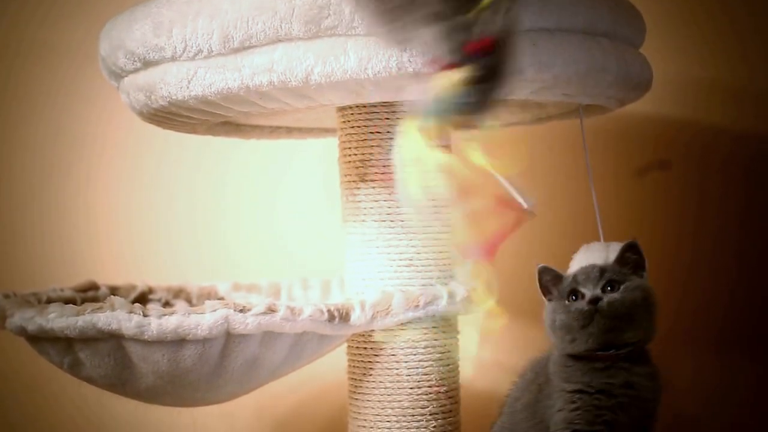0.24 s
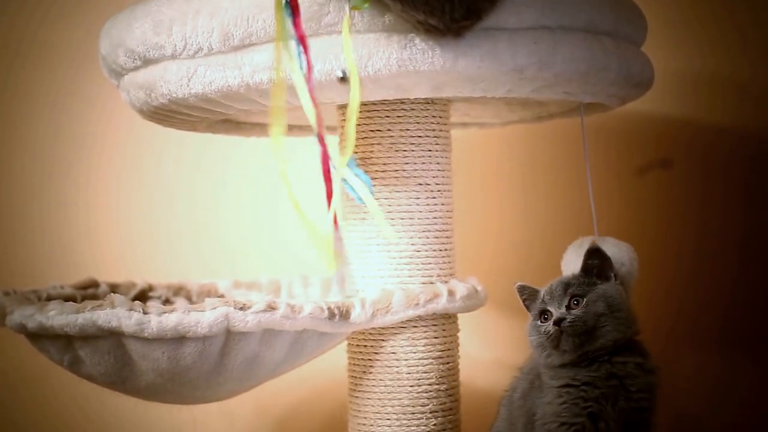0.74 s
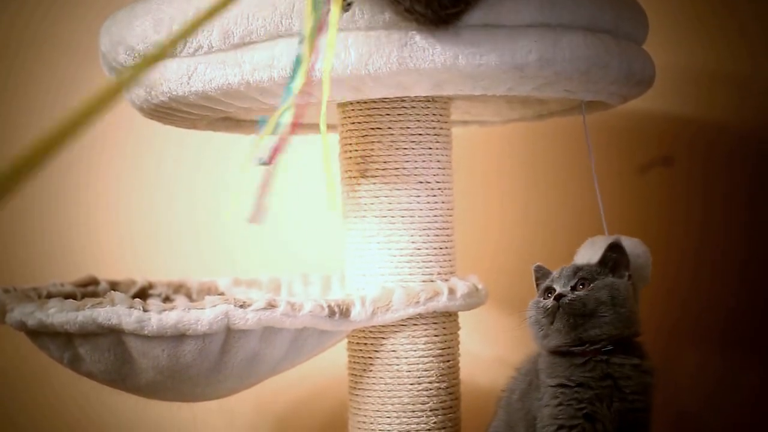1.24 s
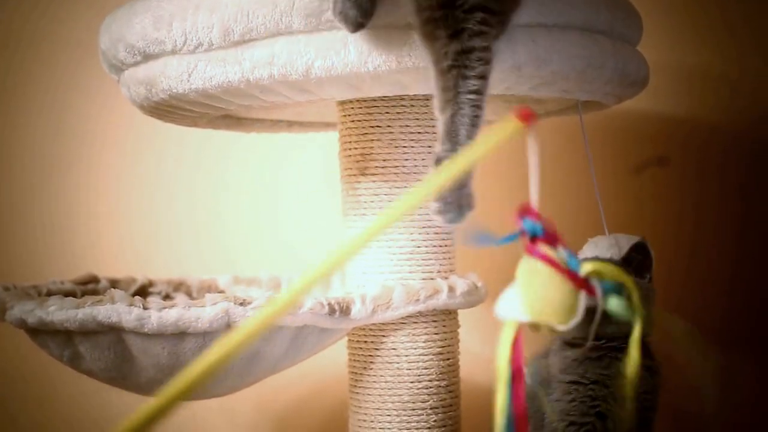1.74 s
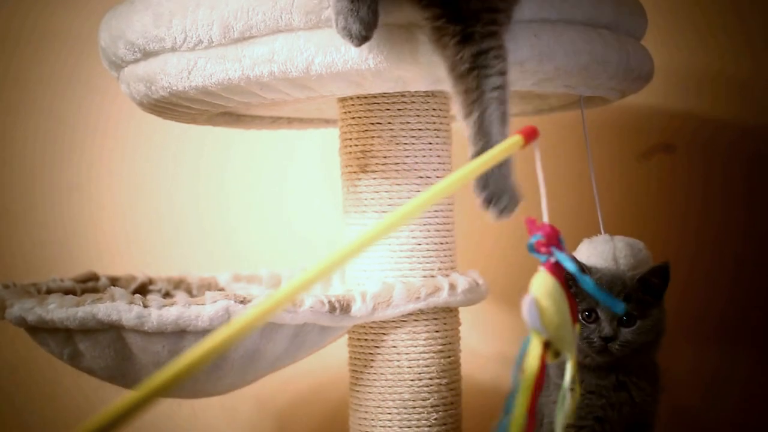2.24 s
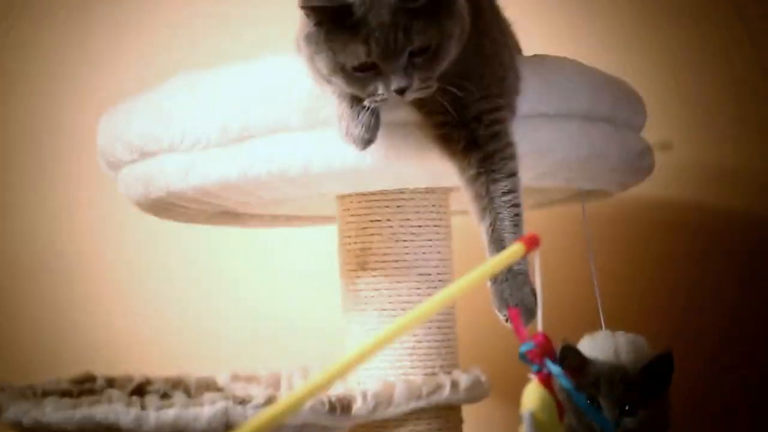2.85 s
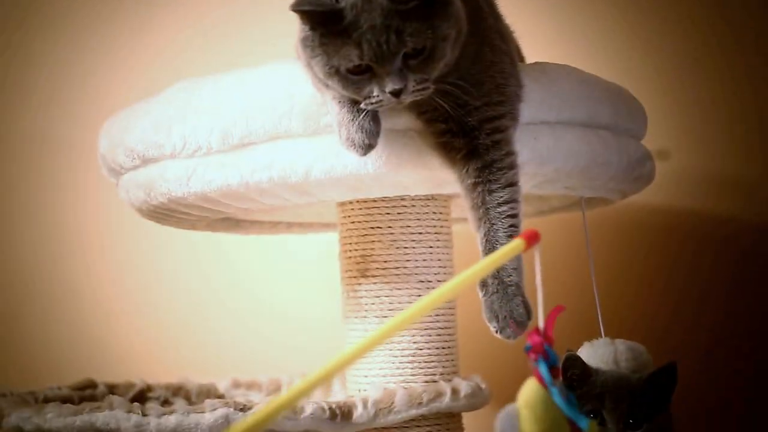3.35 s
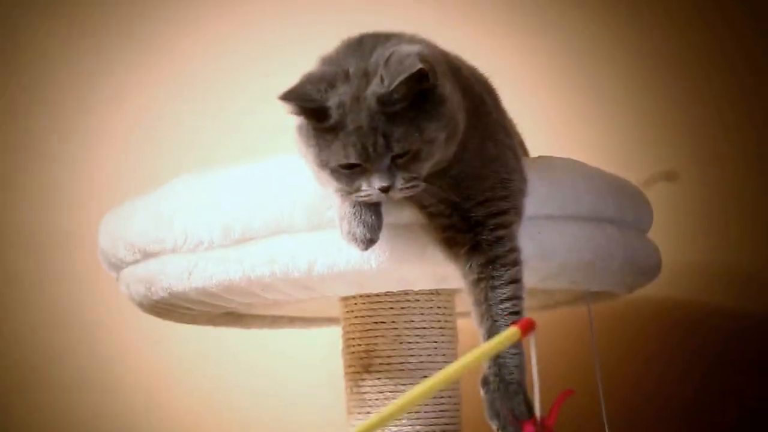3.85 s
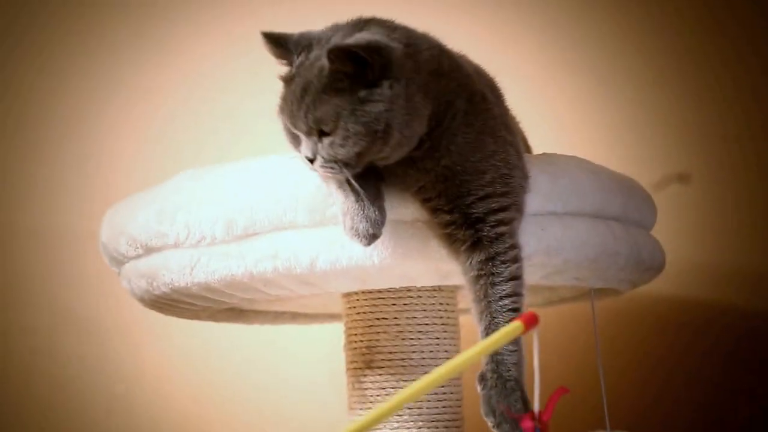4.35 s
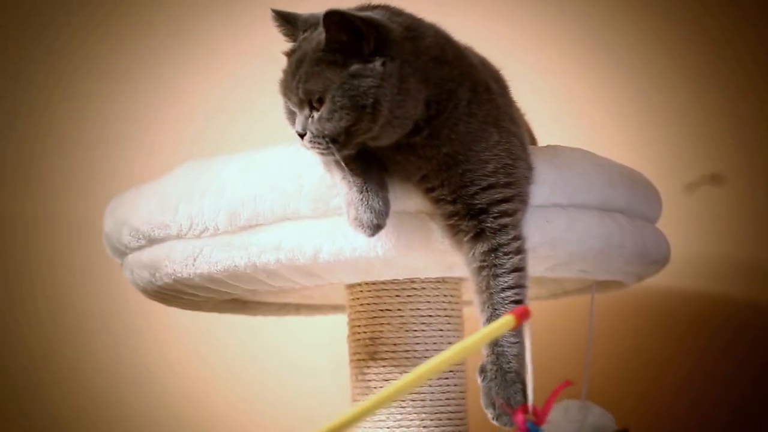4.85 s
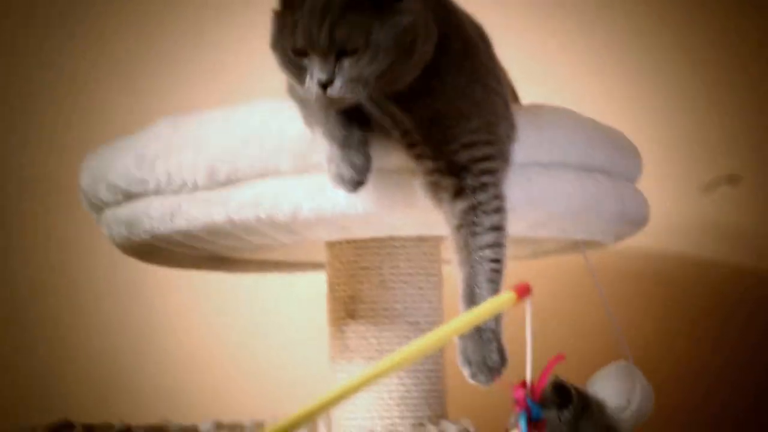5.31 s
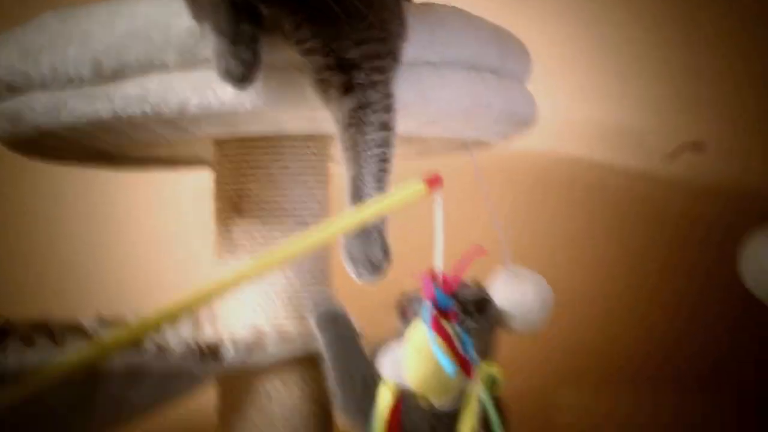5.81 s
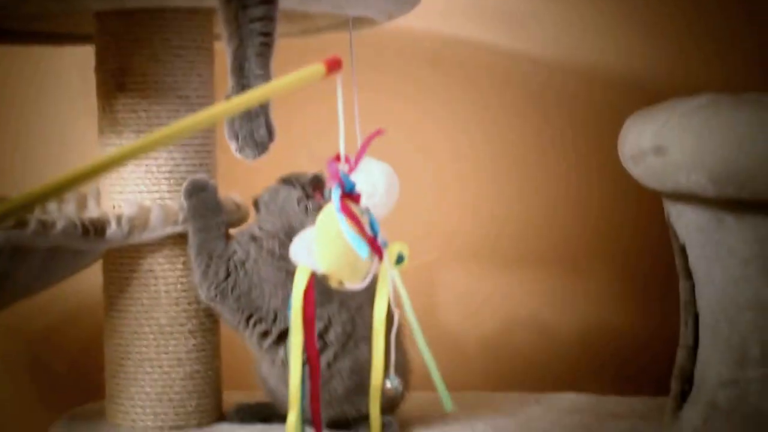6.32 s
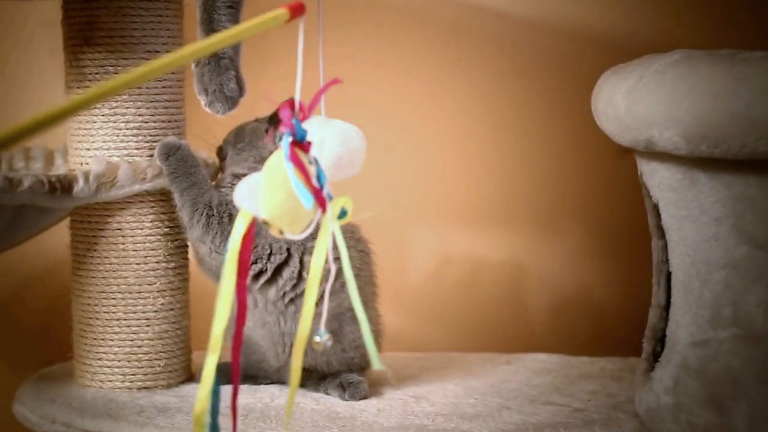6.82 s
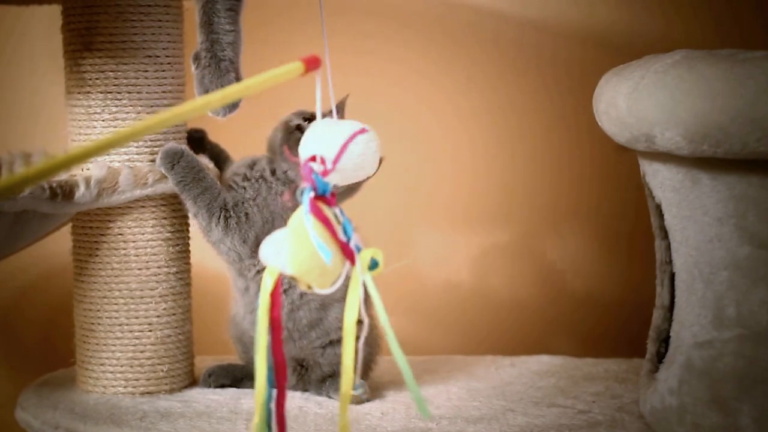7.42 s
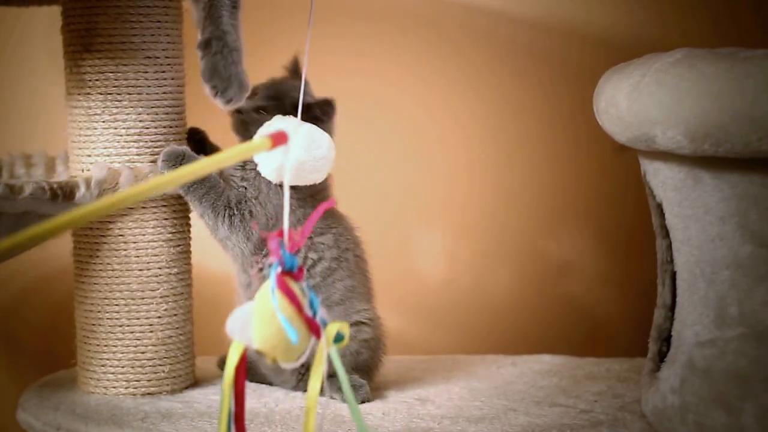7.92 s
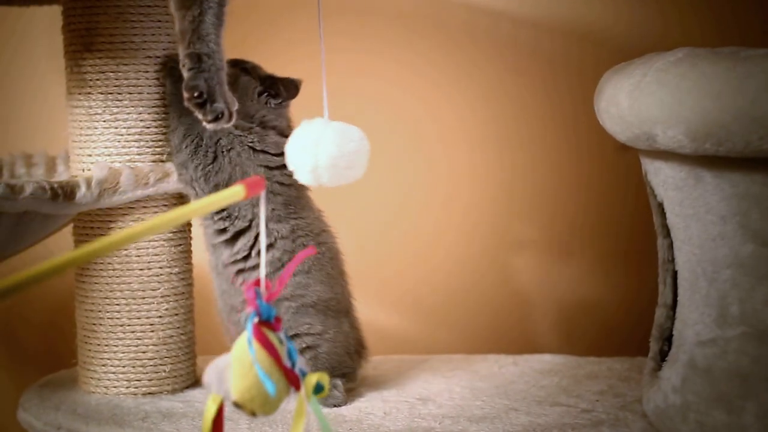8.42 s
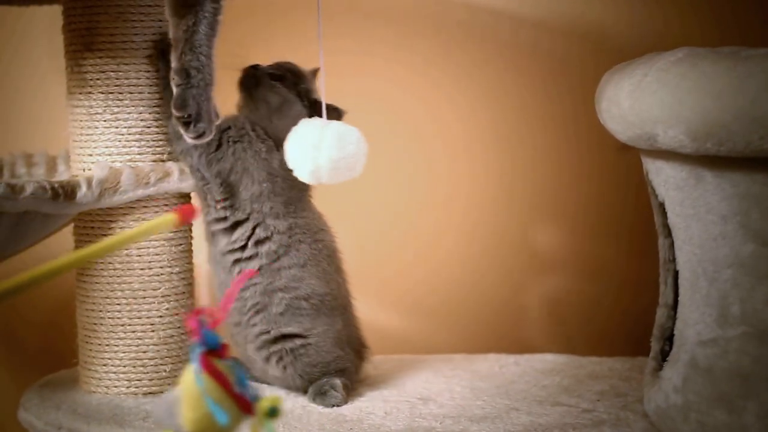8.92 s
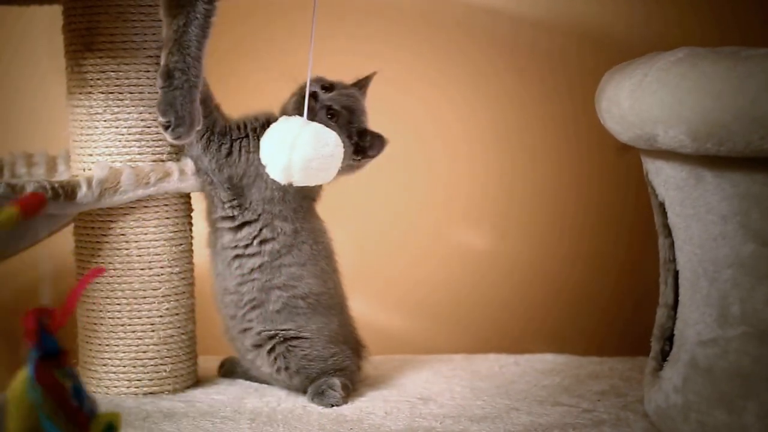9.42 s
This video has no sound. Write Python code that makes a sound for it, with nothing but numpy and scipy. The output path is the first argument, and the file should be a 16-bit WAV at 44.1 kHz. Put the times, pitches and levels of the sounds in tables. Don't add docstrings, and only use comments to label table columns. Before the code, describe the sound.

Small bell jingles, hushed hiss, sharp hollow plastic clacks, a rapid ratcheting creak around the middle, then soft brushes and light knocks indoors.

```python
import sys
import numpy as np
from scipy import signal
from scipy.fft import rfft, irfft, next_fast_len
from scipy.io import wavfile
from scipy.ndimage import uniform_filter1d, map_coordinates

SR = 44100
rng = np.random.default_rng(int(sys.argv[2]) if len(sys.argv) > 2 else 0)


def invert_db(level):
    return 10 ** (np.asarray(level, dtype=float) / 20)


def file_out(sig):
    cols = np.atleast_2d(sig).T
    lim = np.clip(cols, -1, 1)
    pcm = np.round(lim * 32767).astype(np.int16)
    wavfile.write(sys.argv[1], SR, pcm)


N = 426178

# centre [Hz], width [Hz], level [dB].
SHELL_MODES = [(918, 160, 4), (1262, 66, 9.5), (1400, 144, 1), (1813, 135, 9), (2155, 195, 10.5),
               (2560, 110, 6.5)]
LID_MODES = [(2930, 410, 6), (3950, 380, 5.5), (4340, 570, 4), (5100, 1070, -8.5)]
JOINT_MODES = [(364, 92, 0.5), (606, 150, 0.5), (798, 100, 0.5), (1200, 65, -0.5), (1442, 91, 0.5),
               (2450, 2900, -14.5), (3405, 960, -13)]
LEG_MODES = [(112.3, 8.4, 1), (145.7, 9.4, 0.5), (221, 71, 1)]


def unit(x):
    return x / np.sqrt(np.mean(x ** 2) + 1e-20)


def noise():
    return rng.standard_normal(N)


def along(points, hz):
    f, v = np.transpose(points)
    return np.interp(np.log(hz + 1), np.log(f + 1), v)


def filtered(x, response):
    m = next_fast_len(len(x) + min(len(x), SR // 2))
    return irfft(rfft(x, m) * response(np.fft.rfftfreq(m, 1 / SR)), m)[:len(x)]


def modes(table):
    def response(f):
        return sum((-1) ** k * invert_db(db) * 1j * f * width / (hz * hz - f * f + 1j * f * width)
                   for k, (hz, width, db) in enumerate(table))
    return response


def band(x, lo_hz, hi_hz):
    edges_hz = [lo_hz, min(hi_hz, SR / 2.1)]
    return signal.sosfilt(signal.butter(2, edges_hz, "bandpass", fs=SR, output="sos"), x)


def add(out, s, x):
    i = int(round(s * SR))
    out[i:i + len(x)] += x[:len(out) - i]


def crackle(t, tau_s):
    shape = (1 - np.exp(-t / tau_s * 5)) * np.exp(-t / tau_s)
    z = rfft(shape * rng.standard_normal(len(t)))
    return irfft(z / abs(z) ** .45, len(t)) * np.minimum(shape * 30, 1)


def series(start_s, length_s, db, gap_s, scatter, spread_db, larger):
    draw = rng.random((60, 2))
    gaps_s = gap_s * (1 + scatter * np.sqrt(12) * (draw[:, 0] - .5))
    s = start_s + np.cumsum(gaps_s)
    distance_s = abs(s[:, None] - np.transpose(larger)[0]).min(axis=1)
    free = (s < start_s + length_s) & (distance_s > gap_s / 2)
    levels_db = db + spread_db * (1 + np.log(draw[:, 1]))
    return list(zip(s[free], levels_db[free]))


def floor():
    # frequency [Hz], density [dB per Hz].
    air = [(15, -43.5), (25, -17), (172, -0.5), (483, -5), (584, -3.5), (746, -7.5), (1150, -7.5),
           (1320, -12), (3230, -12), (5720, -20.5), (6550, -21), (13300, -17), (15200, -18), (16500, -33.5)]
    # centre [Hz], width [Hz], level [dB].
    fan = [(596, 70, -77), (1195, 44, -85), ]
    # centre [Hz], width [Hz], level [dB].
    circuit = [(6725, 45, -88.5), (10040, 90, -84.5), (13420, 110, -89)]
    # time [s], level [dB].
    stir = [(0, -67), (.5, -69.5), (1.6, -68), (1.95, -59), (2.3, -65.5), (3.2, -73), (4.2, -63),
            (6.9, -62.5), (8, -66.5), (9.5, -66.5), (9.66, -59.5)]
    out = invert_db(-67) * unit(filtered(noise(), lambda f: invert_db(along(air, f))))
    for hz, width_hz, db in fan:
        out += invert_db(db) * unit(filtered(noise(), lambda f: 1 / (1 + ((f - hz) / width_hz * 2) ** 2)))
    for hz, width_hz, db in circuit:
        shake = np.sqrt(2 * np.pi * abs(width_hz) / SR) * noise()
        out += invert_db(db + 4) * np.sin(np.cumsum(2 * np.pi * hz / SR + shake))
    lumps = map_coordinates(rng.standard_normal(200), [np.arange(N) * 14 / SR])
    stir_db = np.interp(np.arange(N) / SR, *np.transpose(stir)) - 8.0 + 1.6 * lumps
    return out + invert_db(stir_db) * unit(band(noise(), 530, 2400))


def brush():
    # start [s], level [dB], t60 [s], low edge [Hz], top edge [Hz].
    brushes = [(1.618, -55, 0.52, 770, 5600), (9.105, -54.5, 0.6, 630, 1540), (9.12, -60, 0.44, 1900, 5500),
               (4.1, -70, 0.46, 550, 4300), (6.62, -65, 0.89, 620, 1600), (4.41, -68, .3, 7000, 9600),
               (4.52, -63, .3, 7600, 9600), (4.66, -68, .3, 7000, 9600), (4.797, -56, .4, 6500, 9700),
               (5.89, -62, .2, 4500, 9000), (8.49, -68, .9, 600, 1300), (9.52, -68, .7, 900, 1400),
               (8.71, -58, 0.61, 750, 1200), (6.245, -52, .5, 2500, 4100)]
    out, t = np.zeros(N), np.arange(SR // 2) / SR
    for s, db, t60, lo_hz, hi_hz in brushes:
        lumps = unit(uniform_filter1d(rng.standard_normal(len(t)), 300))
        level = invert_db(db + 2.5 * lumps - 60 * t / t60) * (1 - np.exp(-t / 0.0071))
        add(out, s, level * unit(band(rng.standard_normal(len(t)), lo_hz, hi_hz)))
    return out


def bell():
    # time [s], peak [dB], low modes [dB], side modes [dB], rattle [dB].
    strikes = [(0.1281, -39, -10, -14, -4), (0.1366, -34.5, -17, -3.5, -18), (0.1474, -43, -30, -26, -2.5),
               (0.298, -32, -26, -11.5, -5), (0.303, -38.5, -12, -10, -1.5), (0.3411, -36.5, -12, -12, -4),
               (.351, -42, -19, -20, -5.5), (1.492, -47.5, -16, -15, -2.5), (1.5219, -48, -19, -13, 0.5),
               (1.5592, -42, -11, -18.5, -3), (2.0148, -48.5, -12, -11, 0.5)]
    # frequency [Hz], level [dB], t60 [s].
    chime = [(2830, -10, .25), (4410, -6, .4), (4510, -6, .35), (4960, -6, .36), (5020, 0, .46),
             (5240, -8, .3), (9210, -11, .25), (9680, -3, .19), (10040, -6, .22), (11550, -3, .17),
             (11590, -6, .17), (11700, -9, .15)]
    # centre [Hz], width [Hz], level [dB].
    hollow = [(4860, 440, -6), (8000, 1600, -8.5), (10300, 3400, -13.5)]
    flutter_db, flutter_rad = 2.6, .45
    out, t = np.zeros(N), np.arange(SR // 2) / SR
    hz, mode_db, t60 = np.transpose(chime)[:, :, None]
    for s, db, low_db, side_db, rattle_db in strikes:
        flutter = uniform_filter1d(rng.standard_normal((2, len(hz), len(t))), 500) * 22
        group_db = np.where(hz < 6000, low_db + 4.0, np.where(hz < 9900, side_db + 5.5, -4))
        ring_db = mode_db + rng.normal(0, 1.9, hz.shape) + group_db + flutter_db * flutter[0]
        tones = np.sin(2 * np.pi * hz * t + flutter_rad * flutter[1])
        ring = (invert_db(ring_db - 60 * t / t60) * tones).sum(axis=0)
        fade = invert_db(-2.5 - 60 * t / 0.0082) + invert_db(-13.5 - 60 * t / 0.45)
        rattle = invert_db(rattle_db) * fade * 3 * filtered(rng.standard_normal(len(t)), modes(hollow))
        add(out, s, invert_db(db) * (invert_db(-16.5) * ring + rattle))
    return out


def chatter():
    # centre [Hz], width [Hz], level [dB].
    panel = [(3900, 470, 0.0), (3000, 500, -5.0)]
    start_s, gap_s, fade_db = 6.5795, 0.016, 4.5
    blows = np.zeros(N)
    k = np.arange(7)
    at = ((start_s + gap_s * k) * SR).astype(int)
    blows[at] = invert_db(-fade_db * k + rng.normal(0, 1, len(k)))
    ticks = filtered(filtered(blows, modes(panel)), modes(panel))
    return invert_db(-45) * ticks / abs(ticks).max()


def single_tones():
    # start [s], length [s], frequency [Hz], level [dB], fade t60 [s].
    moans = [(2.806, 0.17, 112, -42.5, 0.12), (2.99, 0.13, 210, -65.5, 0.49),
             (3.692, 0.048, 108.8, -43, 0.29), (4.86, 0.34, 146, -56.5, .2), (6.576, 0.19, 70, -59, .5),
             (8.315, 0.025, 62, -58, 0.31), (8.704, 0.023, 1900, -60.5, 0.22), (8.963, 0.025, 63, -59, 0.2),
             (9.102, 0.059, 692, -54, 0.15), (9.125, 0.023, 1100, -58, 0.22), (9.098, .008, 1040, -55, .06),
             (3.74, 0.058, 379, -45, 0.083), (7.56, .041, 100, -64, .21), (6.088, 0.04, 1510, -54, .08),
             (6.599, 0.059, 1100, -67, 0.96), (1.559, 0.0059, 367, -50.5, 0.06),
             (2.4505, 0.004, 323, -43.5, 0.052), (1.561, 0.025, 68, -57, 0.19),
             (7.016, 0.025, 52, -60, .21), (7.085, 0.025, 195, -55, .12), (7.245, .03, 200, -53, .12),
             (7.543, 0.005, 416, -49, 0.029), (8.705, 0.023, 207, -55.5, 0.11),
             (9.15, 0.021, 207, -55, 0.095), (2.787, 0.119, 388, -42.5, 0.059), (2.83, 0.083, 275, -47, .1),
             (4.105, .07, 3950, -72, .25), (3.69, .05, 2130, -47, .4), (3.69, .05, 3250, -52.5, .3),
             (2.79, .05, 2100, -51, .3), (1.557, .01, 5020, -59, .07), (2.942, .006, 400, -42, .05),
             (6.25, .06, 600, -44, .12), (8.71, .02, 1250, -64, .2), (6.7, .05, 1400, -70, .4),
             (8.975, .012, 650, -60, .06), (9.645, .015, 1150, -62, .1), (3.683, .02, 270, -40, .1),
             (5.36, .06, 205, -43, .15), (.532, .01, 1200, -66, .1), (6.985, .04, 1300, -64, .1)]
    out = np.zeros(N)
    t = np.arange(SR // 2) / SR
    for s, held_s, hz, db, t60 in moans:
        drift = uniform_filter1d(rng.standard_normal((2, len(t))), 700)
        fade_db = 60 * np.maximum(t - held_s, 0) / t60
        level = invert_db(db - 0.5 + 2.0 * np.sqrt(hz) * drift[0] - fade_db) * (1 - np.exp(-t * hz / 0.5))
        phase = 2 * np.pi * np.cumsum(hz + 16 * np.sqrt(hz) * drift[1]) / SR
        add(out, s, level * np.sin(phase))
    return out


def sway(jolts):
    rest_db, sway_db, t60_s = -82.5, -18.5, 0.7
    keep = invert_db(-60 / t60_s / SR)
    shake = signal.lfilter([1 - keep], [1, -keep], abs(jolts))
    return (invert_db(rest_db) + invert_db(sway_db) * shake) * unit(band(noise(), 55, 140))


def grit():
    # time [s], peak [dB].
    ticks = [(.537, -57), (.981, -44), (4.783, -44), (1.111, -43.5), (6.005, -37), (6.0169, -32),
             (6.032, -34), (6.2472, -30), (6.2763, -34), (6.2873, -33), (6.3109, -30.5), (6.3233, -37),
             (6.3432, -44), (6.3865, -44), (6.477, -38), (6.4837, -29), (6.4955, -46), (6.5146, -41),
             (6.5225, -34), (6.5687, -39), (8.72, -46), (6.2655, -39), (6.4305, -50), (6.45, -39),
             (6.4568, -42), (6.5285, -45), (6.537, -43), (6.556, -50), (6.5955, -52), (6.357, -46)]
    # start [s], length [s], level [dB].
    spells = [
        (5.95, .085, -49),
        (6.246, .11, -45),
        (6.43, .14, -60),
    ]
    grain_modes = [(3920, 600, 1.0), (8100, 560, 2.0), (11300, 2600, -12.0)]  # Hz, width Hz, dB
    out, t = np.zeros(N), np.arange(256) / SR
    grains = list(ticks)
    for start_s, length_s, db in spells:
        grains += series(start_s, length_s, db, gap_s=.006, scatter=.2, spread_db=7, larger=ticks)
    for s, db in grains:
        tick = filtered(crackle(t, 0.00019), modes(grain_modes))
        add(out, s, invert_db(db - 3.5) * tick / abs(tick).max())
    return out


def creak():
    # start [s], length [s], slips [dB], rubbing [dB], legs [dB].
    drags = [(2.438, 0.12, -72, -65, -52.5), (2.777, 0.2, -39.5, -49.5, -48),
             (3.691, 0.18, -57, -77, -45.5), (4.81, 0.092, -55, -68, -51), (5.034, 0.13, -50, -38.5, -42),
             (5.283, .28, -34, -41, -45.5), (5.61, 0.185, -40, -37.5, -39.5),
             (5.889, 0.23, -35, -37.5, -38), (6.19, 0.27, -36, -36.5, -37.5), (6.443, 0.17, -40, -37, -40),
             (7.282, 0.11, -56, -46.5, -58), (9.098, 0.17, -65, -55.5, -73)]
    # time [s], peak [dB].
    catches = [(2.833, -28), (2.9262, -23), (2.943, -25), (3.7922, -24), (3.8062, -21.5), (5.3308, -21),
               (5.3458, -28), (5.369, -24), (5.389, -22), (5.4235, -24), (5.4669, -22.5), (5.4946, -20.5),
               (5.622, -21), (5.6322, -22), (5.6448, -21), (5.6557, -24), (5.6733, -23), (5.6841, -24.5),
               (5.6946, -21.5), (5.706, -29), (5.7178, -23.5), (5.7395, -22.5), (5.7474, -33), (5.942, -24),
               (5.9502, -21.5), (5.9595, -21.5), (5.9683, -21), (5.9801, -22.5), (5.9903, -22),
               (5.9987, -26), (6.014, -21), (6.0283, -20.5), (6.048, -18.5), (6.0674, -20), (6.076, -28),
               (6.2532, -19), (6.2612, -25), (6.2725, -23.5), (6.2836, -21.5), (6.2977, -24), (6.3087, -20),
               (6.3213, -19), (6.3354, -18.5), (6.3499, -18), (6.363, -21.5), (6.3782, -22.5), (6.393, -19),
               (6.4016, -30), (6.4223, -19), (6.4473, -18), (6.4743, -21), (6.4937, -19), (6.5046, -23),
               (6.5203, -18.5), (6.5334, -18.5), (6.5424, -26), (6.5506, -25), (6.5603, -21.5),
               (6.5686, -25), (6.5766, -25),
               (5.376, -29), (5.432, -31), (5.445, -27), (5.476, -29), (5.505, -32), (5.521, -32.5),
              (5.937, -24), (6.4555, -25), (6.4655, -30), (6.483, -25), (6.514, -22), (6.527, -24),
              (6.5375, -26), (6.43, -29), (2.846, -28), (2.856, -31.5), (2.806, -28)]
    stick_s = 0.034
    larger = catches
    slips = list(larger)
    for s, length_s, slip_db, *_ in drags:
        slips += series(s + stick_s, length_s - 2 * stick_s, slip_db, gap_s=.0125, scatter=.13,
                        spread_db=4, larger=larger)

    push = np.zeros(N)
    for (s, db), z in zip(slips, rng.standard_normal((400, 81))):
        phase = np.linspace(0, 7.6 + .6 * z[0], 80) + .03 * np.cumsum(z[1:])
        add(push, s - .0019, invert_db(db + 3.0) * np.hanning(80) * np.sin(phase))
    body = modes(SHELL_MODES + LID_MODES)
    rasp = band(filtered(push * noise(), body), 1200, 4100)
    out = filtered(push, modes(JOINT_MODES)) + invert_db(-14) * rasp

    rubs = [unit(filtered(noise(), part)) for part in (modes(JOINT_MODES), modes(LEG_MODES), body)]
    joint_rub, leg_rub, body_rub = [unit(band(rub, 60, 3600)) for rub in rubs]
    shaken = np.sqrt(abs(uniform_filter1d(out ** 2, 250, origin=100)))
    shaken /= np.sqrt(abs(uniform_filter1d(out ** 2, 4000)) + 1e-6)
    joint_rub *= 0.44 + 0.73 * shaken
    body_rub *= .6 + 0.65 * shaken
    for s, length_s, _, rub_db, legs_db in drags:
        on = slice(int(s * SR), int((s + length_s) * SR))
        u = np.linspace(0, 1, on.stop - on.start)
        arch_db = rub_db - 6 * (2 * u - .9) ** 2
        rubbing = invert_db(arch_db - 3) * joint_rub[on]
        rubbing += invert_db(legs_db - 2.5 - 8 * u ** 2.54) * leg_rub[on]
        rubbing += invert_db(arch_db - 20) * body_rub[on]
        out[on] += rubbing * signal.windows.tukey(len(u), .12)
    return out


def releases():
    # time [s], peak [dB], dull, sharp and bright parts [dB].
    hard = [(1.6139, -36.5, -7, -0.5, -7.5), (2.7781, -12.5, -10, -9.5, -14.5),
            (3.68, -11.5, -13, -6.5, -15), (4.404, -33, -10.5, -12.5, -10.5),
            (4.5155, -27.5, -14, -7.5, -9), (4.6522, -24.5, -16.5, -9.5, -13.5),
            (4.791, -19.5, -17, -11, -12), (5.0443, -16, -12.5, -11.5, -15), (5.1009, -18, -18, -18, -22.5),
            (5.2717, -17.5, -18.5, -11, -16.5), (5.3599, -26, -4, -5.5, -9), (5.6138, -24.5, -5, -6.5, -10),
            (5.881, -20, -20, -11, -14.5), (5.9296, -19, -6.5, -9, -15.5), (6.1834, -22.5, -11, -8.5, -14),
            (6.2374, -17.5, -9.5, -11.5, -16), (7.0782, -37, -8.5, -8.5, -45), (7.236, -28.5, -13, -8, -28),
            (7.2906, -31.5, -22, -18, -21), (7.3189, -29.5, -21, -12.5, -18),
            (8.6972, -33.5, -12, -17.5, -38)]
    # time [s], peak [dB], dull part [dB], edge [dB].
    settles = [(2.2244, -44, -3.5, -31), (2.7646, -39, -4, -5.5), (2.838, -31, -7, -10.5),
               (2.9436, -43, 1, -22), (4.824, -38, -9, -18), (4.8386, -25, -14.5, -12),
               (4.8526, -36, 2, -24), (4.8647, -32.5, -4, -11), (4.9814, -40, -5, -24),
               (5.0178, -27, -17, -14), (5.2832, -36.5, -4, -7), (5.3211, -27.5, -14, -17),
               (5.4077, -23.5, -11, -13), (5.456, -30.5, -2.5, -22), (5.6088, -29, -0.5, -7.5),
               (5.663, -24, -12, -14), (5.8681, -32, -6.5, -26), (5.9075, -37.5, 0, -1),
               (5.923, -27, -7, -5), (6.0721, -33, -4.5, -22), (6.2246, -29, -4, -6),
               (6.2295, -25.5, -29, -11), (6.4479, -30.5, -2.5, -17), (6.4743, -36, 5, -21),
               (7.2483, -35, -12, -12.5)]
    # time [s], peak [dB], dull part [dB], edge [dB].
    taps = [(0.534, -61.5, 1.5, -11), (1.561, -62.5, 2.5, -9), (1.9415, -52, -8.5, -10),
            (2.27, -67, -36, -20), (2.6582, -69.5, 11, -11), (2.6878, -49.5, -7, -17),
            (4.0989, -53.5, 1, -9), (4.132, -56, -6, -25), (5.2352, -44, -0.5, -10),
            (7.017, -74.5, 16.5, -16), (7.1115, -53, -6.5, -27), (7.489, -51, 1, -18.5),
            (7.5451, -56, -29, -21.5), (7.552, -47, -9, -11.5), (8.981, -64, 12, -10),
            (9.1016, -53, -8, -5), (9.12, -50.5, -0.5, -1)]
    # time [s], peak [dB], dull, sharp and bright parts [dB].
    touches = [
        (1.577, -50.5, -8, -13, -8),
        (2.2297, -18, -24, -17.5, -29.5),
        (2.452, -54.5, 13, -25, -40),
        (2.5108, -52, -1, -16, -34),
    ]

    def edged(rows, slope, offset_db):
        return [(s, db, dull, edge, slope * edge + offset_db) for s, db, dull, edge in rows]

    kinds = [(hard, -9), (edged(settles, 1.06, -6.5), -6.5), (edged(taps, 1.3, -1.5), -3), (touches, -16)]
    out = []
    for rows, wet_db in kinds:
        mean_db = np.mean(rows, axis=0)[1]
        out += [(*row, wet_db - 0.2 * (row[1] - mean_db)) for row in rows]
    return out


def coloured(x, s):
    # time [s], centre [Hz], gain [dB].
    colours = [(1.6139, 450, -11), (1.6139, 1990, -12), (1.6139, 3100, -7), (1.6139, 8300, -6),
               (2.2295, 570, 5), (2.2295, 864, -8), (2.2295, 1160, 5.5), (2.7781, 1530, 0), (2.7781, 5100, 4),
               (2.7781, 3100, -1), (2.838, 1170, -11), (2.838, 3480, -8.5), (2.838, 570, 6.5),
               (3.68, 1350, -7), (3.68, 2570, -6.5), (4.404, 850, -8), (4.404, 2900, 6), (4.5155, 830, 5.5),
               (4.5155, 1510, -13), (4.5155, 4000, -5), (4.6522, 355, 9), (4.6522, 2550, 2.5),
               (4.791, 1190, 8.5), (4.791, 2000, -3.5), (4.791, 4500, 5.5), (5.0178, 2600, 8.5),
               (5.0178, 900, -1), (5.0443, 850, -7), (5.0443, 3100, -4), (5.1009, 800, -15),
               (5.1009, 2000, -9), (5.1009, 3100, 4), (5.3599, 5000, 4), (5.3599, 3900, -10),
               (5.6138, 2550, 8.5), (5.6138, 3150, -10), (5.881, 2000, -5), (5.881, 1500, 3.5),
               (5.9296, 850, 2.5), (5.9296, 3150, -3), (5.9296, 8300, 6.5), (6.1834, 2000, -9),
               (6.1834, 2530, 8), (6.1834, 350, -9), (6.2374, 650, 6.5), (6.2374, 1500, 6),
               (6.2374, 2550, 2.5), (7.0782, 1280, 7), (7.0782, 6300, -5), (7.236, 2000, -5),
               (7.236, 3150, -3), (7.236, 8300, 11), (7.3189, 570, 5), (7.3189, 1170, -4), (2.838, 5100, 12),
               (2.838, 1750, 8), (2.7781, 6300, 4.5), (3.68, 2100, 4), (3.68, 1010, -5), (8.981, 1300, -10)]
    rows = [row[1:] for row in colours if abs(row[0] - s) < .004]

    def bump(f):
        gain = 1
        for hz, db in rows:
            width = 1j * f * hz * 0.17
            gain = gain * (hz * hz - f * f + width * invert_db(db / 2)) / (hz * hz - f * f + width / invert_db(db / 2))
        return gain
    return filtered(x, bump) if rows else x


def snaps():
    # frequency [Hz], density [dB per Hz].
    crack = [(3410, -13.5), (5800, 5), (6600, 8), (7500, 11), (9220, 7), (9800, 6.5), (12100, 2),
             (16500, -28)]
    # centre [Hz], width [Hz], level [dB].
    afar = [(1131, 330, 0.5), (1534, 310, 4.5), (2110, 420, 4), (2660, 500, -1), (3180, 930, -5.5)]
    near, far = np.zeros((2, N))
    t = np.arange(SR // 6) / SR
    click = 1. * (t == 0)

    def top(f):
        return invert_db(along(crack, f)) * (f > 5000)

    def low(f):
        return modes(JOINT_MODES)(f) + invert_db(-0.5) * modes(LEG_MODES)(f)

    def soft(part):
        return lambda f: part(f) / (1 - (f / 5200) ** 2 + .9j * f / 5200) ** 2

    paths = soft(modes(SHELL_MODES)), soft(low), soft(modes(LID_MODES)), top
    rings = [unit(filtered(click, path)) for path in paths]
    spray = invert_db(-6.5) * unit(band(click, 900, 6500))
    blurred = unit(filtered(click, soft(modes(afar))))
    echoes = blurred, rings[1], invert_db(-5.5) * rings[2] + spray, rings[3]
    for s, db, dull_db, sharp_db, bright_db, wet_db in releases():
        burst = crackle(t[:1024], 0.0025 * invert_db(0.13 * (db + 20.0)))
        burst = np.pad(burst, (0, len(t) - len(burst)))
        parts = [*signal.fftconvolve(burst[None], rings[:3], axes=1)[:, :len(t)], filtered(burst, top)]
        pad_hz = min(9000 * invert_db(.33 * (db + 19.5)), SR / 2.2)
        parts[1] = signal.sosfilt(signal.butter(2, pad_hz, fs=SR, output="sos"), parts[1])
        levels_db = db - 0.5, db + dull_db + 8.5, db + sharp_db + 7.5, db + bright_db + 1.5
        parts = [invert_db(level) * p / abs(p).max() for p, level in zip(parts, levels_db)]
        add(near, s - .0006, coloured(sum(parts), s))
        echo = sum(ring * np.linalg.norm(p) / np.sqrt(len(t)) for ring, p in zip(echoes, parts))
        add(far, s, invert_db(wet_db) * echo)
    return near, far


def room(x):
    # frequency [Hz], t60 [s].
    decay = [(100, 0.67), (500, 0.31), (2000, 0.64), (5000, 0.45), (10000, 0.47), (16000, 0.14)]
    out, step = np.zeros(N), SR // 4
    for i in range(0, N, step):
        hz, t, z = signal.stft(rng.standard_normal(SR * 3 // 4), SR, nperseg=256)
        tail = signal.istft(z * invert_db(-60 * t / along(decay, hz)[:, None]), SR, nperseg=256)[1]
        add(out, i / SR + .006, signal.fftconvolve(x[i:i + step], tail / np.linalg.norm(tail)))
    return out


def scene():
    near, far = snaps()
    rub = creak() + grit()
    toy = bell()
    walls = room(far + invert_db(-15.5) * rub + invert_db(-13.5) * toy)
    stand = near + rub + single_tones() + sway(near + rub) + chatter()
    return (stand + toy + walls + floor() + brush())[None]


def low_pass(x):
    return signal.sosfilt(signal.butter(12, 16750, fs=SR, output="sos"), x)


def record(dry):
    def path(f):
        bass = (f / 45) ** 2 / np.sqrt(1 + (f / 45) ** 4)
        return np.where(f < 15900, 1, invert_db(-22)) * (f < 16750) * bass
    heard = filtered(dry[0], path)
    return low_pass(heard[None])


dry = scene()
out = record(dry)
file_out(out)
```